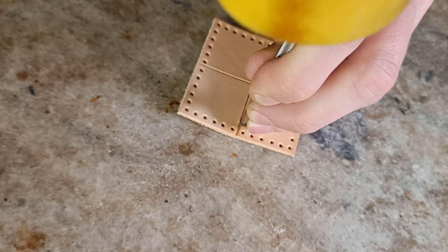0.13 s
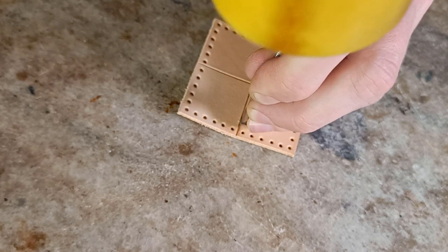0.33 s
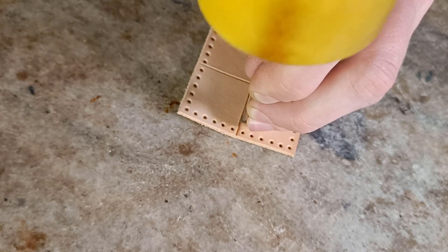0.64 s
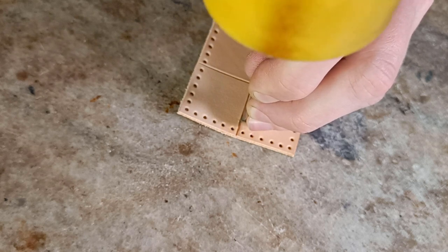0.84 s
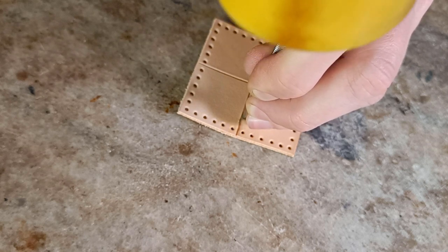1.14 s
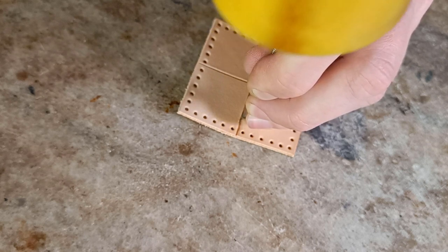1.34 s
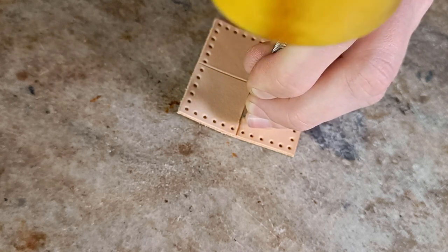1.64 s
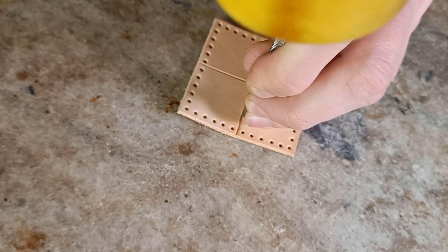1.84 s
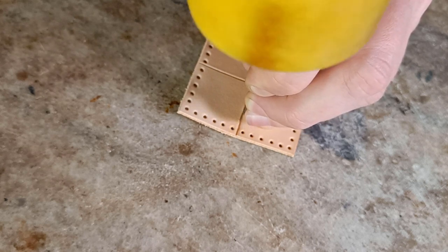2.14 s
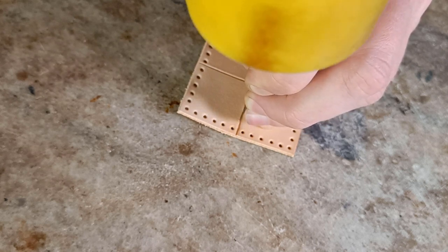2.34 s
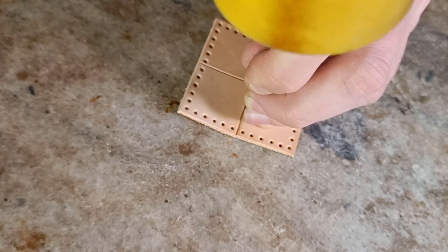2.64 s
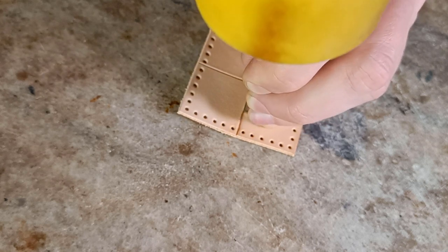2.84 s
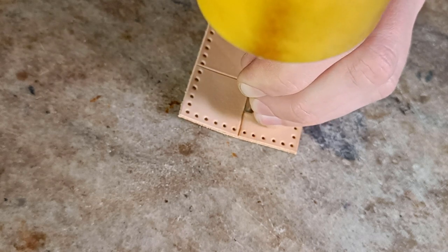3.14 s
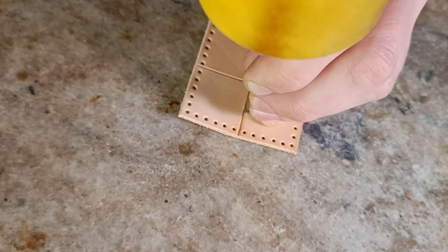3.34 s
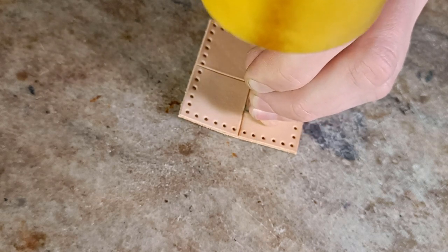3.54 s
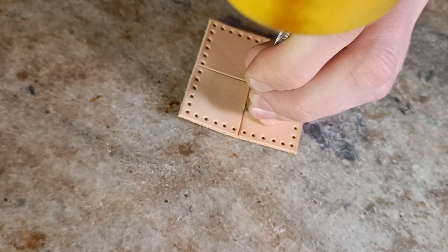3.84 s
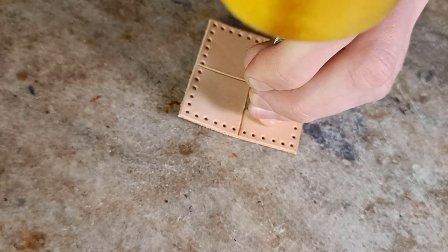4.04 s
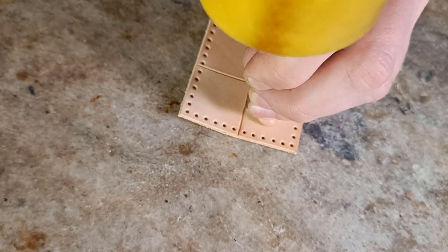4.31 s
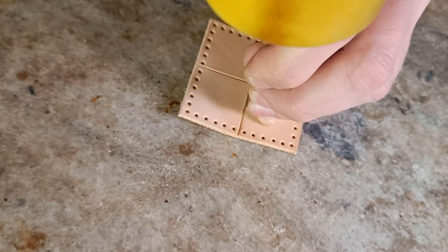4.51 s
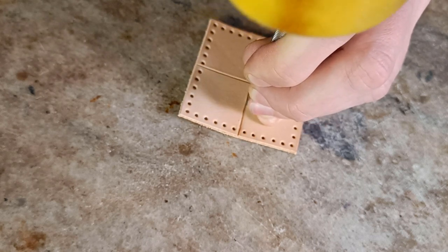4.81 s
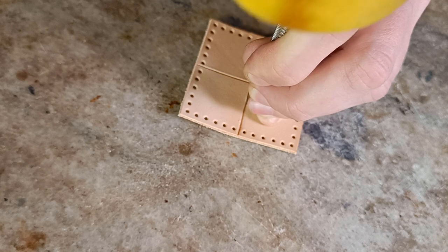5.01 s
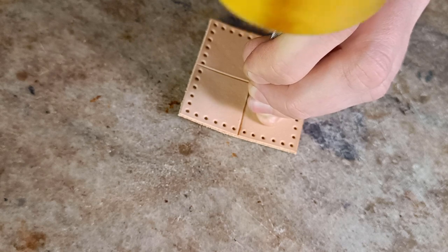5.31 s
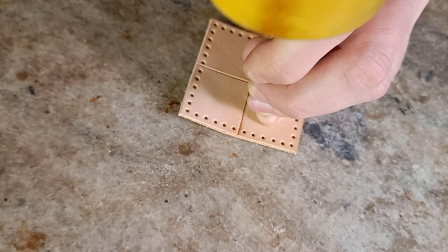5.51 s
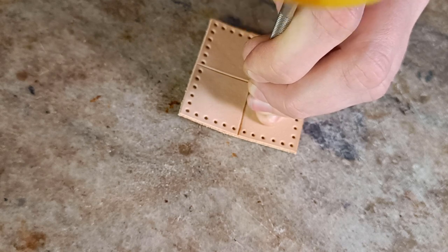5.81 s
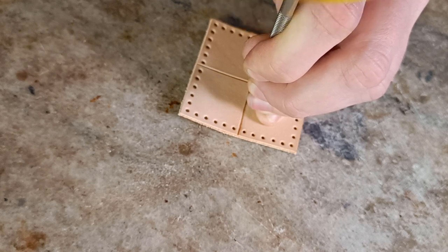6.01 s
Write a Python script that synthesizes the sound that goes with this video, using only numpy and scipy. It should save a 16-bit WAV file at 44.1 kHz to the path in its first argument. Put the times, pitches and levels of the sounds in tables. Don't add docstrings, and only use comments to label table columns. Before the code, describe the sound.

Close, dry tapping in a small room: a plastic mallet strikes a steel stamp pressed into leather on a stone slab. From 0.1 s the blows come evenly, about five a second, each a hard clack of mid pitch with a thin bright metallic edge, a short low thump from the bench, a brief slab ring and a small room tail that is cut away in steps. A faint double touch and a light bounce surround the blow near 0.5 s. The blows dip slightly around 1 to 1.7 s, then firm up until 2.8 s. In the pause, a very soft rub over leather rises around 3.0 to 3.15 s and fades by 3.5 s over faint hiss. At 3.6 s a barely audible tap restarts the run, a stronger one follows at 3.8 s, steady from 4.0 s, loudest from about 5.2 s until the last blow just before 6 s.

```python
import sys
import numpy as np
from scipy import signal
from scipy.io import wavfile
from scipy.ndimage import uniform_filter1d

SR = 44100
rng = np.random.default_rng(int(sys.argv[2]) if len(sys.argv) > 2 else 0)


def decibels_to_gain(level_db):
    exponent = np.asarray(level_db, float) / 20
    return 10 ** exponent


def pcm_store(signal):
    levels = np.round(np.clip(np.atleast_2d(signal), -1, 1) * 32767)
    wavfile.write(sys.argv[1], SR, levels.astype(np.int16).T)


N = 271656

# start in seconds, click in dB, thump in dB over click, steel ring in dB over click.
BLOWS = [(.092, -21.5, -11.5, -17.5), (.292, -22, -11, -16.5), (0.4813, -21.5, -12, -14),
         (0.6921, -22, -10.5, -21), (.9, -23.5, -12.5, -19), (1.0954, -22, -13.5, -23.5),
         (1.288, -23.5, -12.5, -21.5), (1.478, -22.5, -11.5, -23), (1.6567, -24.5, -11, -19),
         (1.8548, -22, -11.5, -20), (2.0584, -20.5, -13, -24.5), (2.2455, -20, -11.5, -23),
         (2.4174, -20, -12.5, -25.5), (2.6277, -19.5, -12, -20), (2.808, -20, -11.5, -17),
         (3.5838, -35, -14.5, -38), (3.7921, -28.5, -11, -12), (3.9985, -24, -12.5, -22),
         (4.188, -24.5, -12, -25.5), (4.3828, -24, -12.5, -19), (4.587, -24.5, -12.5, -24.5),
         (4.7687, -23.5, -11, -20), (4.9637, -20, -13.5, -21), (5.1643, -17.5, -11.5, -20.5),
         (5.3632, -19.5, -11, -22.5), (5.5644, -18.5, -11, -22), (5.7661, -18.5, -10, -15.5),
         (5.9714, -18, -11, -16)]
EARLIER_BLOW = (-.085, -22, -14, -19)
# time in seconds,
# lower mode in Hz, upper mode in Hz, upper mode in dB over click, askew landing in dB over click.
FACE = [(.09, 1605, 2523, -7.5, -13), (0.701, 1540, 2474, -9.5, -16), (.9, 1450, 2630, -14, -21.5),
        (2.05, 1670, 2736, -10.5, -22.5), (2.809, 1713, 2880, -22.5, -20.5), (3.58, 1420, 2707, -14, -27.5),
        (3.79, 1360, 2070, -3.5, -15), (4.001, 1490, 2706, -12.5, -21.5), (4.799, 1563, 2750, -13.5, -24),
        (5.16, 1675, 2870, -18, -21), (5.97, 1704, 2880, -16, -17.5)]


def evened(x):
    return x / np.sqrt(np.mean(x ** 2) + 1e-20)


def read_curve(points, hz):
    f, value = np.transpose(points)
    return np.interp(np.log(hz + 1), np.log(f + 1), value)


def add(mix, s, sound):
    at = round(s * SR)
    sound = sound[:, max(-at, 0):]
    part = mix[:, max(at, 0):][:, :sound.shape[1]]
    part += sound[:, :part.shape[1]]


def ring(hz, t60, t):
    t = np.maximum(t, 0)
    return np.sin(2 * np.pi * hz * t) * decibels_to_gain(-60 * t / t60)


def noise(shape, same, frames, size=256):
    a, b, c, d = rng.standard_normal((frames, size // 2 + 1, 4)).T
    left = a + 1j * b
    right = same * left + np.sqrt(1 - same ** 2) * (c + 1j * d)
    return signal.istft(np.array([left, right]) * shape, nperseg=size, noverlap=size * 3 // 4)[1]


def hum():
    # frequency in Hz, level in dB per Hz.
    hum_colour = [(12, -29), (22, -2), (60, -8), (200, -10), (360, -10), (520, -14), (1000, -15),
                  (3000, -21), (5000, -22), (9000, -27), (16500, -31)]
    # frequency in Hz, left-right likeness from -1 to 1.
    likeness = [(60, 1), (240, 0.55), (950, 0.18), (3770, -0.91), (15000, -0.22)]
    hz = np.fft.rfftfreq(2048, 1 / SR)[:, None]
    same = np.clip(read_curve(likeness, hz), -1, 1)
    air = noise(decibels_to_gain(read_curve(hum_colour, hz)), same, N // 512 + 5, 2048)[:, :N]
    return decibels_to_gain(-77.5) * evened(air)


def click(modes, pitch, late, port_lag):
    t = np.maximum(np.arange(1024) / SR - late - np.array([[0], [port_lag]]), 0)
    out = np.zeros((2, 1024))
    for (hz, crest, *db), (detune, spread) in zip(modes, rng.standard_normal((5, 2))):
        swell = (t / crest) ** 2 * np.exp(2 - 2 * t / crest)
        hz = hz * pitch * (1 + .012 * detune)
        db = np.array(db) + 1.5 * spread
        out += decibels_to_gain(db)[:, None] * swell * np.sin(2 * np.pi * hz * t)
    return out


def contact(lower_hz, upper_hz, rim_db, askew_db, steel_db):
    # factor on the lower mode, seconds to the crest, left in dB, right in dB.
    mallet_modes = [(.82, 0.0012, -9.5, -13.5), (1.0, 0.00089, 4, -7), (1.19, 0.0013, -7.5, -11.5)]
    # factor on the upper mode, seconds to the crest, left in dB, right in dB.
    rim_modes = [(.92, 0.0019, -18, -9.5), (1.02, 0.0013, 7.5, 2)]
    # Hz, seconds to the crest, left in dB, right in dB.
    body_modes = [(607, 0.0031, -6.5, -13), (901.4, 0.002, -10, -16), (1081, 0.0015, -0.5, -9)]
    edge_modes = [(4010, 0.0006, -2, 1), (4620, 0.00077, -3, -6.5), (5877, 0.00055, 3.5, -8),
                  (6180, 0.00051, -20.5, -2.5), (7380, 0.00072, -19.5, -7)]
    steel_modes = [(8657, 0.0006, 2, -1), (9377, 0.00057, 2.5, -19.5), (9913, 0.00057, -2, -30),
                   (12300, 0.00066, -19, -32), (15000, 0.00057, -35, -26.5)]
    out = click(mallet_modes, lower_hz, 0, 0.00016)
    out += decibels_to_gain(rim_db) * click(rim_modes, upper_hz, 0.00035, 0.00027)
    out -= decibels_to_gain(0.59 * askew_db - 1.1) * click(body_modes, 0.8996, 0, 0.00022)
    out += decibels_to_gain(askew_db + 3) * click(edge_modes, 0.904, 0.000429, 0.0003145)
    out += decibels_to_gain(steel_db + 7.5) * click(steel_modes, 0.97, .0009, .00024)
    return out


def bench():
    # frequency in Hz, t60 in seconds, signed swing left, signed swing right.
    bench_modes = [(50, 0.6, 0.08, 0.17), (86.5, 0.12, -0.82, 0.07), (111.0, 0.8, -0.99, -0.87),
                   (129.2, 0.314, -2.22, -1.8), (153.8, 0.12, -3.32, -2.36), (169.5, 0.202, -2.21, -1.98),
                   (183.5, 0.8, -0.47, -0.61), (199.7, 0.795, -0.17, -0.25), (225.1, 0.269, 1.2, 1.26),
                   (245.6, 0.21, 0.78, 0.14), (263.7, 0.206, 1.14, 0.52), (289.7, 0.12, -1.0, -0.97),
                   (340, 0.24, -0.42, -0.32), (375.4, 0.24, 0.6, 0.36), (407.2, 0.12, 0.78, 0.13),
                   (492.5, 0.12, -0.68, -0.4), (528.0, 0.25, -0.3, 0.05)]
    # Hz, t60 in seconds, swing left, swing right, delay in seconds.
    thump_modes = [(164, .031, 13.8, 8.2, 0), (371, .019, -5, -.7, .0017)]
    t = np.arange(SR // 2) / SR
    out = np.zeros((2, len(t)))
    for hz, t60, left, right in bench_modes:
        out += np.outer([left, right], ring(hz, t60, t))
    for hz, t60, left, right, lag in thump_modes:
        out += np.outer([left, right], ring(hz, t60, t - lag))
    no_push = signal.butter(2, 14, "high", fs=SR, output="sos")
    out = signal.sosfiltfilt(no_push, out, padlen=0)
    return out / 6.0 * decibels_to_gain(-70.0 * np.maximum(t - .11, 0))


def slab():
    # frequency in Hz, level in dB, t60 in seconds.
    slab_modes = [(500.7, -0.5, 0.16), (1140, -16, 0.47), (1260, -4, 0.11), (1470, -1, 0.24),
                  (1696, 1.5, 0.15), (1949, -4, 0.22), (2019, -32.5, 5.0), (2100, -8, 0.073),
                  (2245, -14, 0.11), (2842, -9.5, 0.068), (3020, -17, 0.26), (3090, -16, 0.25)]
    t = np.arange(SR // 4) / SR
    out = np.zeros((2, len(t)))
    for hz, db, t60 in slab_modes:
        sides = np.sign(rng.standard_normal(2))
        out += decibels_to_gain(db) * np.outer(sides, ring(hz, np.clip(t60, .1, .4), t))
    fade_in = 1 - np.exp(-(t / .008) ** 2)
    return out * decibels_to_gain([[-19.5], [-23.0]]) * fade_in


def room_tail():
    # frequency in Hz, left in dB, right in dB.
    room_colour = [(307, -20.5, -30.5), (473, -6.5, 3), (800, -20, -15), (1900, -18, -8), (2960, -20, -12),
                   (3800, -4.5, -11.5), (5100, -29.5, -10.5), (7020, -11, -1.5), (8920, -18.5, -22.5),
                   (10900, -29.5, -15), (12500, -19.5, -19), (15700, -27.5, -18)]
    # frequency in Hz, t60 in seconds.
    room_decay = [(400, 0.43), (1500, 0.4), (3000, 0.37), (8000, 0.32), (15000, 1)]
    hz = np.fft.rfftfreq(256, 1 / SR)[:, None]
    t = np.arange(300) * 64 / SR
    f, *ports = np.transpose(room_colour)
    colour_db = np.array([read_curve(np.transpose([f, db]), hz) for db in ports])
    tail = noise(decibels_to_gain(colour_db - 60 * t / read_curve(room_decay, hz)), 0.096, frames=300)
    return tail * (1 - np.exp(-(np.arange(tail.shape[1]) / SR / 0.0021) ** 2))


def blows():
    # start in seconds, click in dB,
    # thump in dB over click, steel in dB over click.
    grazes = [
        (0.459, -44, -37, -30.5),
        (0.466, -40.5, -31, -35),
        (.504, -36.5, -31, -28.5),
    ]
    # lower mode in Hz, upper mode in Hz, upper in dB, askew in dB.
    graze_face = (1150, 2400, -11, -18)
    # delay in seconds, level in dB.
    echoes = [(.0048, -30.5), (.0085, -5.5), (.011, -11.5), (0.0142, -10.5), (0.016, -17), (0.022, -18),
              (0.041, -18.5)]
    out = np.zeros((2, N))
    thump, usual_tail = bench(), room_tail()
    other_tails = np.array([room_tail() for _ in range(4)])
    rings = slab()
    when, *spot = np.transpose(FACE)
    struck = [EARLIER_BLOW, *BLOWS]
    landings = [[np.interp(blow[0], when, v) for v in spot] for blow in struck]
    landings += [graze_face for _ in grazes]
    for (s, db, thump_db, steel_db), landing in zip([*struck, *grazes], landings):
        direct = contact(*landing, steel_db)
        variation = np.tensordot(rng.standard_normal(len(other_tails)), other_tails, axes=1)
        tail = 0.57 * usual_tail + 0.091 * variation
        add(out, s + .0001, decibels_to_gain(db + 3.5) * direct)
        for lag, echo_db in echoes:
            add(out, s + lag, decibels_to_gain(db - 7.5 + echo_db) * (direct + 0.17 * direct[::-1]))
        add(out, s + .0001, decibels_to_gain(db + thump_db + 9.5) * thump)
        add(out, s, decibels_to_gain(db) * rings)
        add(out, s, decibels_to_gain(db - 36.5) * signal.fftconvolve(direct, tail, axes=1))
    return out


def rub():
    # frequency in Hz, level in dB per Hz.
    rub_colour = [(200, -6), (400, 0), (700, -5), (1150, -3), (2200, -10), (3600, -11), (6000, -19),
                  (8300, -13), (9000, -16), (9800, -11), (11000, -22), (14000, -40)]
    # time in seconds, level in dB.
    rub_course = [
        (2.96, -100),
        (3.04, -90),
        (3.149, -84.5),
        (3.28, -86.5),
        (3.399, -89.5),
        (3.5, -103.5),
        (3.57, -102),
    ]
    s, db = np.transpose(rub_course)
    hz = np.fft.rfftfreq(256, 1 / SR)[:, None]
    friction = evened(noise(decibels_to_gain(read_curve(rub_colour, hz)), 0.088, frames=N // 64 + 5)[:, :N])
    return friction * decibels_to_gain(np.interp(np.arange(N) / SR, s, db, -130, -130) + 21.0)


def gate():
    open_s, hold_s, shut_s, sink_s = 0.0087, 0.0763, .118, 0.17
    t, open_db = np.arange(N) / SR, np.zeros(N)
    when, *_, askew = np.transpose(FACE)
    for s, db, thump_db, _ in [EARLIER_BLOW, *BLOWS]:
        share = np.clip(0.47 - 0.07 * (db + thump_db + 32.5), 0, 1)
        hold = hold_s + .0012 * max(np.interp(s, when, askew) + 21.0, 0)
        held_db = 14.5 + 46.5 * np.maximum(t - s - .035, 0)
        for until, step_db in [(sink_s, 4.5), (shut_s, 4.6 + 14.1 * (1 - share)), (hold, held_db)]:
            open_db = np.where((t > s - open_s) & (t < s + until), step_db, open_db)
    return decibels_to_gain(uniform_filter1d(open_db, size=200) - 16.5)


def scene():
    return blows() + rub()


def roll_off(x):
    return signal.sosfilt(signal.butter(12, 16780, fs=SR, output="sos"), x)


def record(dry):
    edge = signal.firwin(255, 16300, window=("kaiser", 7), fs=SR)[None]
    mix = signal.oaconvolve(dry * gate() + hum(), edge, "same")
    return roll_off(mix)


dry = scene()
out = record(dry)
pcm_store(out)
```